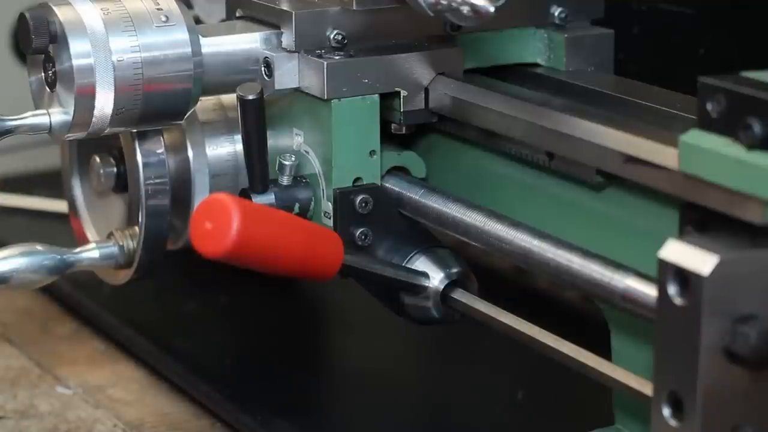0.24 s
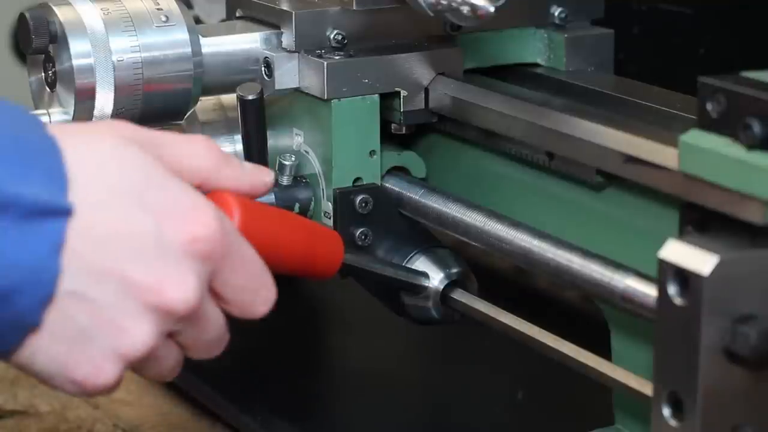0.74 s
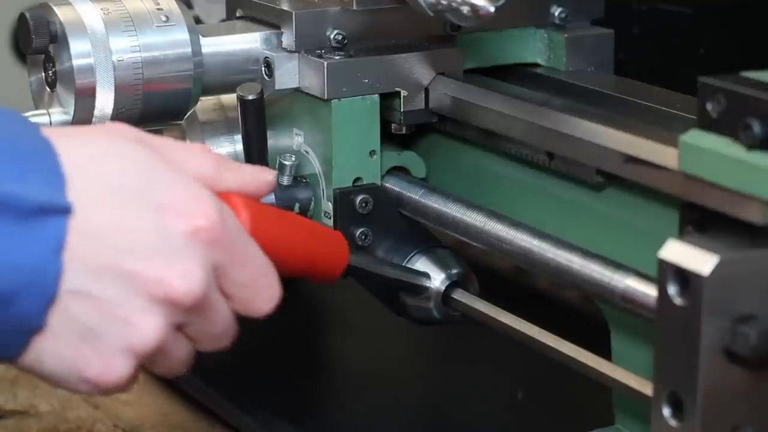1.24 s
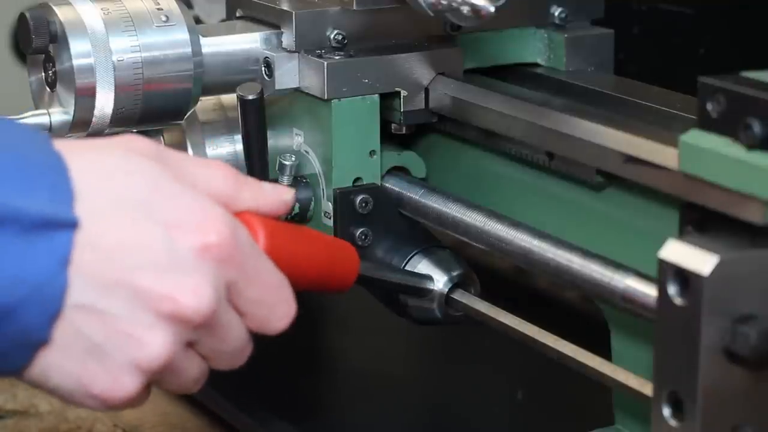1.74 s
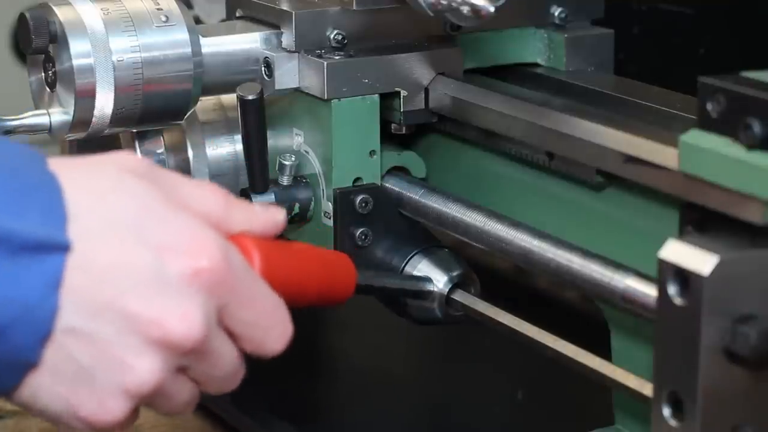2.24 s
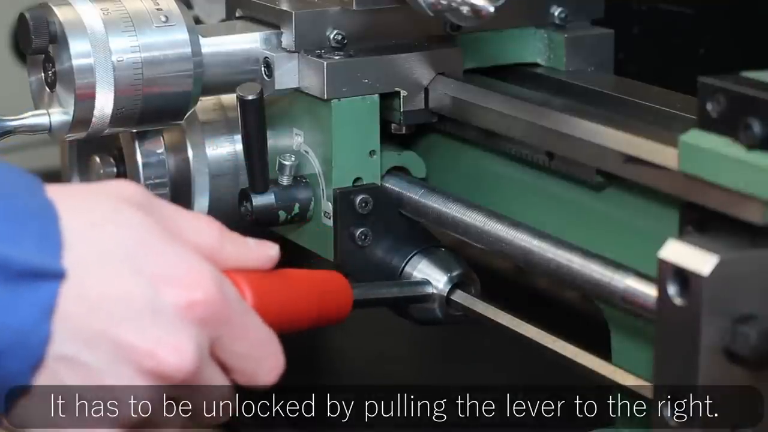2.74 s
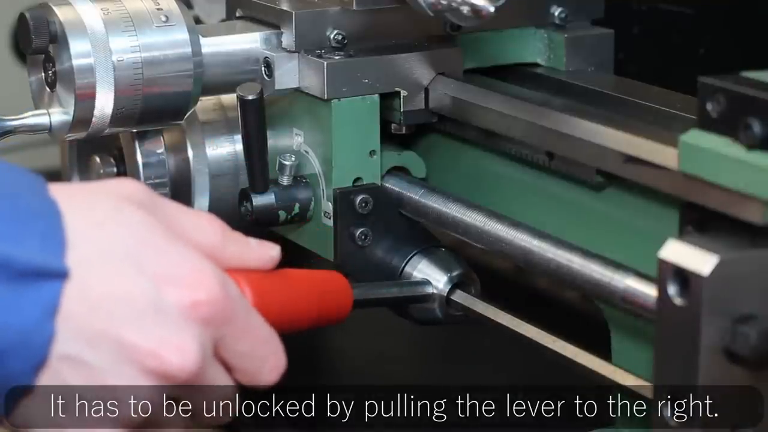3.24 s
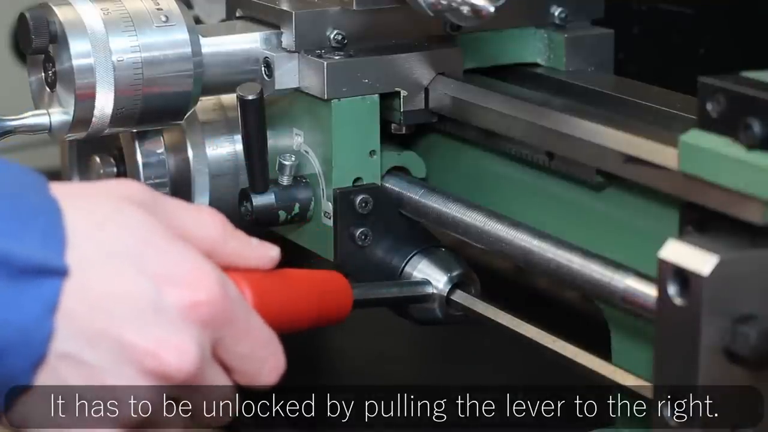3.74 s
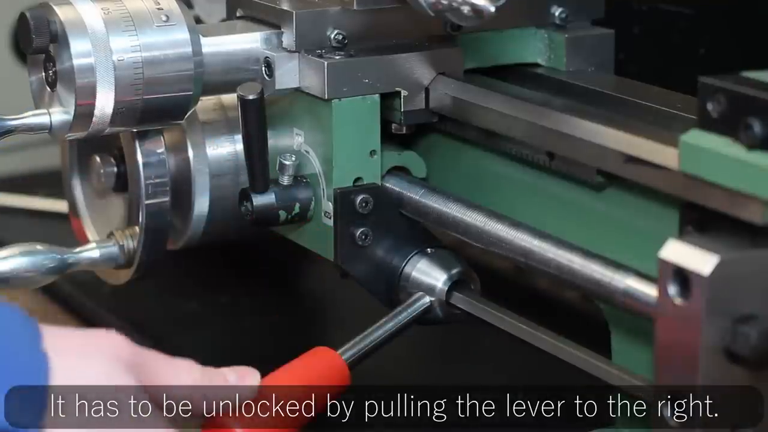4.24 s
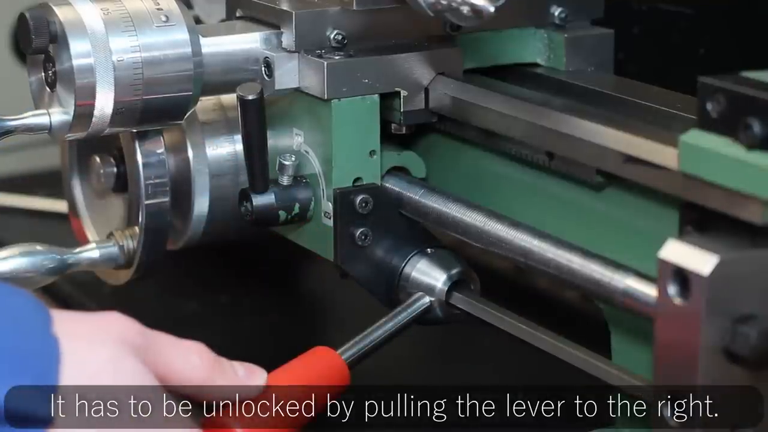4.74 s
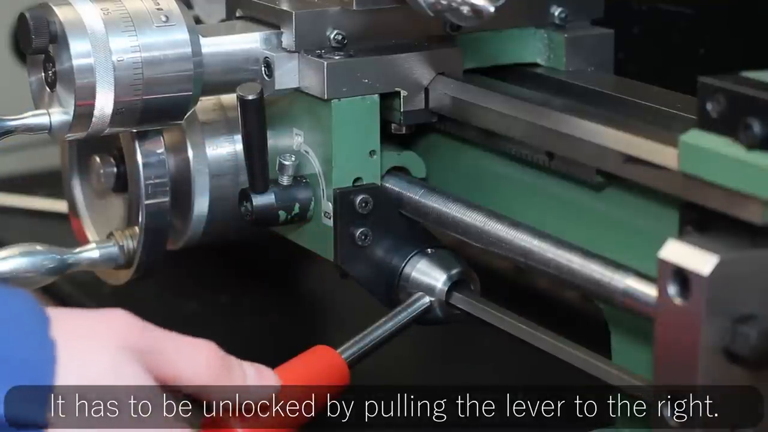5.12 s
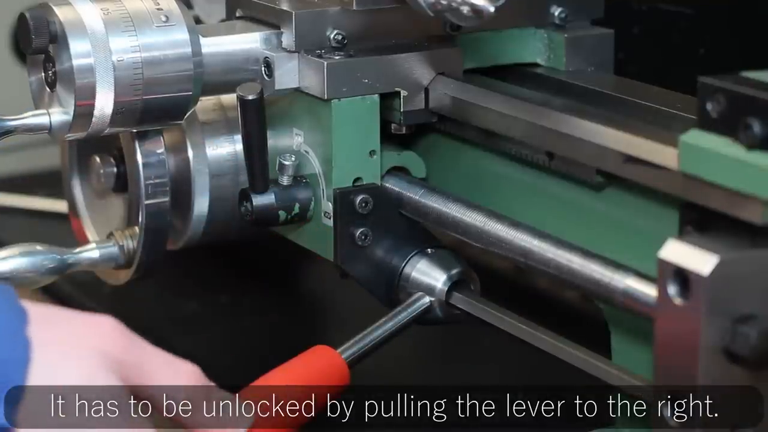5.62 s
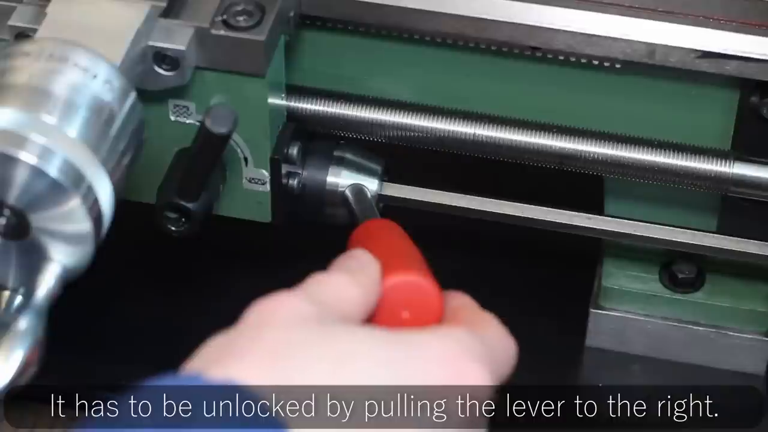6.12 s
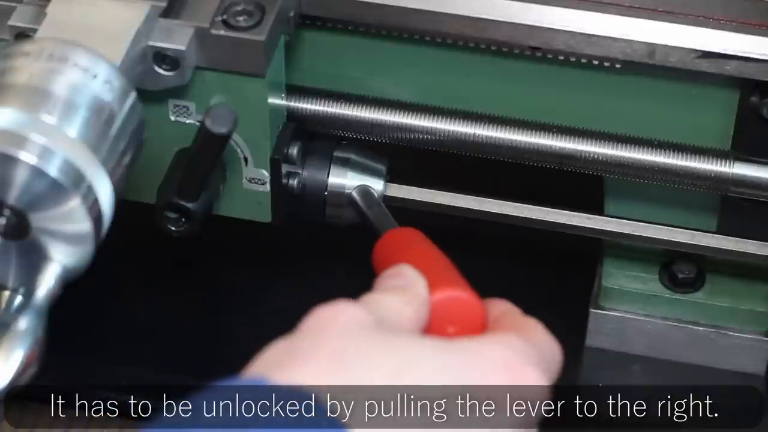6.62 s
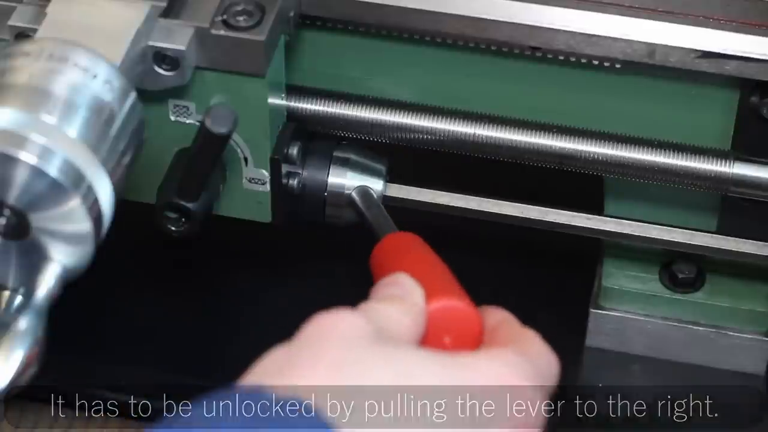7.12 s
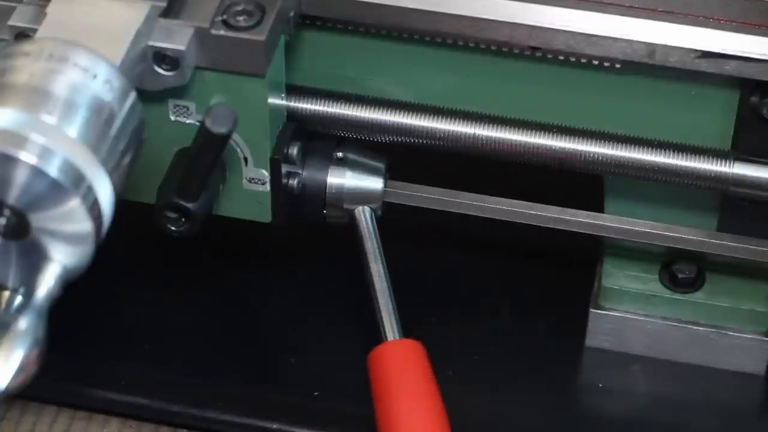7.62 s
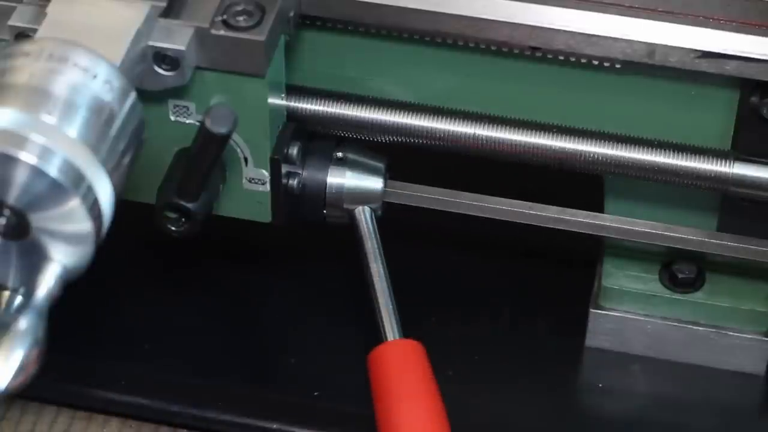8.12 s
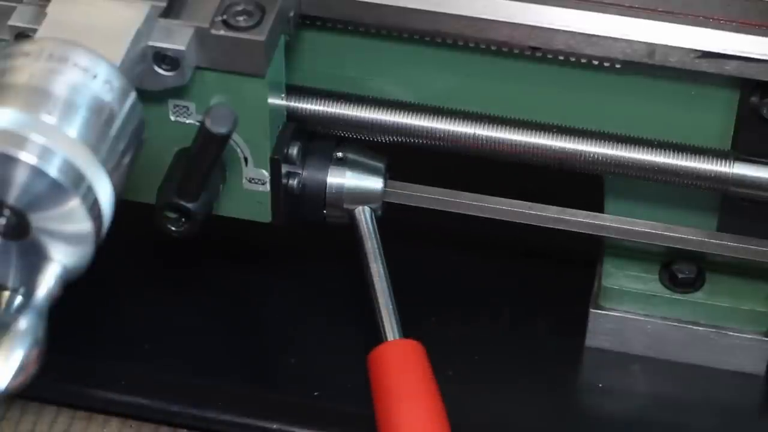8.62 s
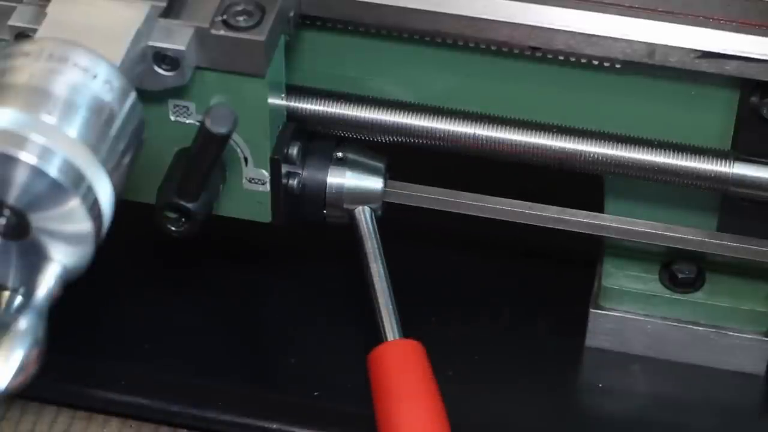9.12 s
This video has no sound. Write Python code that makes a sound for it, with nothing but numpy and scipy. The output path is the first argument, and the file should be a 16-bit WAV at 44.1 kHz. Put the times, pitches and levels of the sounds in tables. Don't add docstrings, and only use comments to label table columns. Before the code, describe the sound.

Close mono pickup of a small metal lathe. Soft air and hiss come first, then a light touch, a loud unlocking clack and dry metallic scraping with bright clicks. A switch snaps, and the geared motor surges upward in pitch, chattering and singing before steadying. The run ends suddenly with the change of viewpoint. After a quieter pause with small handling sounds, a heavier double clack launches another, brighter run with deeper throbbing.

```python
import sys
import numpy as np
from scipy import signal
from scipy.fft import rfft, irfft, next_fast_len
from scipy.io import wavfile
from scipy.ndimage import uniform_filter1d, map_coordinates

SR = 44100
rng = np.random.default_rng(int(sys.argv[2]) if len(sys.argv) > 2 else 0)


def invert_db(level):
    return 10 ** (np.asarray(level, dtype=float) / 20)


def master(y):
    cut = np.clip(np.atleast_2d(y).T, -1, 1)
    pcm = np.round(cut * 32767)
    wavfile.write(sys.argv[1], SR, pcm.astype(np.int16))


N = 413216
TIME = np.arange(N) / SR


def unit(x):
    return x / np.sqrt(np.mean(x ** 2) + 1e-20)


def noise():
    return rng.standard_normal(N)


def wobble(rate):
    knots = rng.standard_normal(int(N * rate / SR) + 4)
    return map_coordinates(knots, [TIME * rate])


def sine(hz, phase=0):
    return np.sin(2 * np.pi * hz * TIME + phase)


def filtered(x, response):
    m = next_fast_len(N + SR // 2)
    hz = np.fft.rfftfreq(m, 1 / SR) + 1e-3
    return irfft(rfft(x, m) * response(hz), m)[..., :N]


def colour(points):
    hz, db = np.transpose(points)
    return lambda f: invert_db(np.interp(np.log(f), np.log(hz), db))


def modes(peaks):
    def response(f):
        total = 0
        for k, (hz, width, db) in enumerate(peaks):
            damping = 1j * f * width
            total = total + (-1) ** k * invert_db(db) * damping / (hz * hz - f * f + damping)
        return total
    return response


def band(x, lo_hz, hi_hz):
    return unit(filtered(x, lambda f: 1 / np.sqrt((1 + (lo_hz / f) ** 16) * (1 + (f / hi_hz) ** 16))))


def bursts(times, levels_db, t60s, rise):
    env, t = np.zeros(N + SR), np.arange(SR // 2) / SR
    for s, db, t60 in zip(times, levels_db, t60s):
        env[round(s * SR):][:len(t)] += invert_db(db - 60 * t / t60) * (1 - np.exp(-t / rise))
    return env[:N]


def impacts(spiky_db, rate):
    return noise() * invert_db(spiky_db * wobble(rate))


def speed(start_s, full_hz):
    ramp_s, overshoot_hz, hunt_s, hunt_fade_s = .225, 12, .4, .25
    since = np.maximum(TIME - start_s - ramp_s, 0)
    swing = overshoot_hz * np.exp(-since / hunt_fade_s) * np.sin(2 * np.pi * since / hunt_s)
    return full_hz * np.clip((TIME - start_s) / ramp_s, 0, 1) + swing


# drive_multiple, first_run_db, second_run_db, added_pulling_db, added_braking_db
ORDERS = [(4, -45, -46, 9, 15), (6, -47, -49, 18, -6), (8, -48, -50, 8, 22), (12, -47, -48, 6, 11),
          (16, -52, -54, 4, 25)]
# pitch_hz, first_run_db, second_run_db
SINGING = [(414, -44.5, -41.5), (699, -56, -49)]
# drive_multiple, first_run_db, second_run_db
SIDE_TONES = [(2, -67.5, -72), (3, -80, -75), (4, -76, -76), (6, -78, -73)]


def motor(drive_hz, bed, run):
    angle = 2 * np.pi * np.cumsum(drive_hz) / SR
    slope = np.gradient(drive_hz) * SR
    unrest = 1 + np.minimum(np.abs(slope) / 150, 2.5)
    change = uniform_filter1d(slope, size=900)
    pull = np.clip(change / 150, 0, 1) * (drive_hz / drive_hz.max()) ** 2
    brake = np.clip(-change / 62, 0, 1)
    grid_hz = np.arange(1, 3000, 2.)
    bed_gain = np.abs(modes(bed)(grid_hz)) ** .5

    tones = np.zeros(N)
    for multiple, *run_db, pull_db, brake_db in ORDERS:
        level_db = run_db[run] + pull_db * pull + brake_db * brake
        level_db += 2.3 * (pull + brake) * (wobble(45) - 2.05)
        level_db += 1.6 * wobble(7) + 1.5 * unrest * wobble(60)
        tone = np.sin(multiple * angle + 0.41 * unrest * wobble(50))
        tones += np.interp(multiple * drive_hz, grid_hz, bed_gain) * invert_db(level_db) * tone

    turning = np.clip(3 * drive_hz / drive_hz[-1] - .4, 0, 1)
    for hz, *run_db in SINGING:
        level_db = run_db[run] + 1.6 * wobble(9) + 1.3 * wobble(40)
        tones += turning * invert_db(level_db) * sine(hz, .6 * wobble(25))

    carrier_hz = 15961
    for multiple, *run_db in SIDE_TONES:
        tones += invert_db(run_db[run] + 2.8 * wobble(25)) * sine(carrier_hz, -multiple * angle)
    shaft_angle = 27.2 / 148 * angle
    return np.sqrt(2) * tones, shaft_angle


SPLITS_HZ = [120, 480, 1380, 4000, 19000]


def gears(effort_db, slow_db, inrush, bed, wash, knocks, shaft, wash_db, throb_db, knock_hz, hum_db,
          growl_db, hiss_db, cap_db):
    growl_db = growl_db + effort_db - 0.054 * slow_db
    rattle_db = effort_db + 0.78 * slow_db
    hiss_db = hiss_db + 0.86 * (effort_db + 28.5) + 0.89 * slow_db
    running_db = np.minimum(growl_db, cap_db)
    turn = (1 + 0.13 * wobble(6)) * np.cos(shaft + 0.55 * wobble(3.2))

    s, peak_db = np.transpose(knocks)
    blows = bursts(s - .003, peak_db, 0 * s + 0.03, rise=0.002)
    first_contact = bursts(s - .001, peak_db + 8, 0 * s + .0006, rise=.00005)
    forces = np.array([invert_db(throb_db * turn) * impacts(2.14, 400),
                       invert_db(0.42 * throb_db * turn) * impacts(2.7, 400),
                       first_contact + invert_db(-9) * blows * noise()])
    rattled_bed = [(hz, w, db - 6 * (hz < 800 and w < 20)) for hz, w, db in bed]
    main, fine, struck = filtered(forces, modes(rattled_bed))

    def body(ringing, depth_db):
        broad = filtered(invert_db(depth_db * turn) * impacts(0.87, 600), colour(wash))
        return unit(ringing) + invert_db(wash_db) * unit(broad)

    steady = body(main, throb_db)
    sound = invert_db(running_db - 9.5) * band(steady, *SPLITS_HZ[:2])
    sound += invert_db((growl_db + running_db) / 2 - 2) * band(steady, *SPLITS_HZ[1:3])
    sound += invert_db(rattle_db - 3) * band(steady, *SPLITS_HZ[2:4])
    sound += invert_db(hiss_db) * band(body(fine, 0.41 * throb_db), *SPLITS_HZ[3:])
    sound += invert_db(running_db - 34) * band(steady, 25, 97)

    sound += invert_db(0.5) * np.sqrt(np.mean(blows ** 2)) * band(struck, knock_hz, 3400)
    hum = np.sqrt(2) * sine(99, .5 * wobble(12))
    return sound + (invert_db(hum_db) + inrush) * invert_db(0.44 * slow_db + 2.7 * wobble(10)) * hum


def spindle(start_s, full_hz, effort, bed, wash, knocks, run, **mix):
    drive_hz = speed(start_s, full_hz)
    effort_s, effort_points_db = np.transpose(effort)
    effort_db = np.interp(TIME, effort_s, effort_points_db)
    gate = (TIME >= effort_s[0]) & (TIME <= effort_s[-1])
    tones, shaft = motor(drive_hz, bed, run)
    slow_db = 20 * np.log10(np.clip(drive_hz / full_hz, .15, 1))
    inrush_peak_s, inrush_width_s = start_s + 0.2, 0.23
    inrush = invert_db(-54) * np.exp(-((TIME - inrush_peak_s) / inrush_width_s) ** 2)
    return gate * (tones + gears(effort_db, slow_db, inrush, bed, wash, knocks, shaft, **mix))


# pitch_hz, width_hz, level_db
BED_SIDE = [(408, 10, -0.5), (499, 69, -12.0), (592, 11, 1.5), (700, 13, -10.0), (770, 8, -19.5),
            (876, 16, 0.0), (1119, 19, -3.5), (1186, 8, -8.5), (1261, 150, -18.0), (1331, 8, -9.5),
            (1501, 78, -12.5), (1601, 95, -7.5), (1746, 35, -1.0), (1862, 33, -10.5), (1942, 29, -6.5),
            (2042, 18, -5.5), (2096, 50, -8.5), (2187, 51, -7.0), (2299, 53, -8.5), (2413, 36, -13.5),
            (2463, 16, -11.5), (2558, 30, -11.5), (2685, 31, -10.0), (2778, 19, -3.0), (2886, 86, -9.0),
            (3050, 93, -11.5), (3167, 44, -12.0), (3431, 85, -17.0), (3574, 11, -14.5), (3649, 16, -20.5),
            (3841, 46, -18.5), (4075, 23, -20.0), (4189, 8, -25.5), (4326, 16, -23.5), (4475, 47, -22.5),
            (4943, 150, -24.5), (5160, 40, -21.0), (5361, 150, -32.5), (5712, 37, -22.5), (5982, 8, -21.5),
            (6139, 8, -30.0), (6231, 8, -22.0), (6353, 49, -26.5), (6526, 126, -29.0), (6888, 150, -30.5),
            (7428, 8, -29.0)]
# pitch_hz, level_db (per Hz)
WASH_SIDE = [(18, -45.0), (60, -28.0), (140, -25.0), (250, -20.5), (780, -22.5), (1400, -19.0),
             (2200, -26.5), (3300, -26.5), (5500, -31.0), (8000, -36.5), (11000, -44.0), (11700, -41.5),
             (15800, -44.0)]
# start_s, peak_db
KNOCKS_FIRST = [(4.3093, -26), (4.3772, -20.5), (4.4226, -17), (4.4689, -18), (4.5268, -20), (4.5617, -19),
                (4.7304, -23), (4.7543, -19), (4.7912, -18.5), (4.8326, -18.5), (4.9174, -18.5),
                (4.9903, -28), (5.0671, -23), (5.096, -20.5), (5.1404, -25), (5.1679, -18), (5.2237, -23),
                (5.3519, -21.5), (5.3968, -22.5), (5.4682, -22), (5.5849, -23), (5.6203, -25),
                (5.6567, -22.5), (5.7246, -20.5), (5.759, -19), (5.8822, -23.5), (5.9072, -15.5)]
# time_s, level_db
EFFORT_FIRST = [(4.212, -62), (4.261, -28), (4.285, -29.5), (4.32, -29.5), (4.44, -24.5), (4.5, -26.5),
                (4.64, -25), (4.685, -26.5), (4.715, -31.5), (4.77, -26), (4.855, -27.5), (4.9, -30.5),
                (4.96, -31.5), (5.09, -30), (5.5, -30), (6.028, -30)]


def first_run():
    return spindle(4.212, 148.1, EFFORT_FIRST, BED_SIDE, WASH_SIDE, KNOCKS_FIRST, run=0,
                   wash_db=-10.5, throb_db=1.8, knock_hz=1520, hum_db=-63.5,
                   growl_db=-4, hiss_db=-44.5, cap_db=-33)


# pitch_hz, width_hz, level_db
BED_ABOVE = [(409, 8, 1.5), (588, 18, -2.0), (702, 8, -2.5), (811, 8, -11.0), (877, 38, -5.5),
             (1202, 150, -11.0), (1328, 17, -10.5), (1493, 68, -9.0), (1660, 57, -4.5), (1766, 38, -3.0),
             (1850, 43, -3.0), (1947, 150, -11.5), (2051, 30, -6.5), (2126, 14, -10.0), (2205, 44, -9.5),
             (2418, 85, -10.0), (2549, 19, -8.0), (2682, 51, -5.0), (2782, 20, 3.0), (2850, 31, 2.5),
             (2943, 54, -4.0), (3088, 64, -8.0), (3342, 41, -12.0), (3432, 25, -10.0), (3605, 66, -17.0),
             (3662, 35, -14.0), (3831, 115, -16.5), (3945, 41, -12.5), (4090, 101, -23.0),
             (4204, 30, -18.0), (4351, 24, -15.5), (4459, 55, -15.5), (4682, 136, -17.0),
             (5002, 150, -19.0), (5226, 42, -18.0), (5331, 29, -22.0), (5425, 8, -40.5), (5606, 150, -30.0),
             (5874, 16, -17.5), (5996, 27, -30.0), (6132, 8, -22.0), (6238, 31, -23.5), (6498, 21, -24.0),
             (6619, 83, -29.0), (6874, 44, -25.0), (7132, 89, -28.5)]
# pitch_hz, level_db (per Hz)
WASH_ABOVE = [(18, -37.5), (60, -39.5), (140, -27.5), (250, -15.0), (780, -17.5), (1400, -23.0),
              (2200, -13.0), (3300, -32.5), (5500, -28.0), (8000, -36.0), (11000, -45.5), (11700, -40.5),
              (15800, -43.0)]
# start_s, peak_db
KNOCKS_SECOND = [(7.634, -17), (7.671, -14), (7.6982, -19), (7.799, -26), (7.8244, -22), (7.8673, -22),
                 (7.9003, -23), (7.9406, -24), (7.985, -22), (8.0225, -19), (8.0552, -21), (8.1327, -25),
                 (8.1816, -32), (8.224, -16.5), (8.2647, -24), (8.288, -18), (8.3631, -15.5),
                 (8.4038, -18.5), (8.4965, -20), (8.5522, -20), (8.6031, -27), (8.6275, -22), (8.6682, -28),
                 (8.7032, -21), (8.76, -22), (8.8166, -25), (8.849, -18.5), (8.9216, -17.5), (8.9613, -18),
                 (8.9967, -23), (9.0294, -15.5), (9.071, -21.5), (9.102, -18), (9.1339, -19.5),
                 (9.1818, -26), (9.2084, -24), (9.2624, -25), (9.2835, -20), (9.3289, -24), (9.3554, -22)]
# time_s, level_db
EFFORT_SECOND = [(7.44, -49), (7.48, -33.5), (7.52, -26), (7.66, -22), (7.72, -23.5), (7.86, -22.5),
                 (7.95, -24.5), (8.25, -27), (9.37, -26.5)]


def second_run():
    return spindle(7.432, 148.7, EFFORT_SECOND, BED_ABOVE, WASH_ABOVE, KNOCKS_SECOND, run=1,
                   wash_db=-8.5, throb_db=2.4, knock_hz=2000, hum_db=-71,
                   growl_db=-6, hiss_db=-42.5, cap_db=-32)


# time_s, half_length_s, pitch_hz, width_hz,
# level_db
FLARES = [(4.284, 0.026, 612, 30, -36.5), (4.314, 0.051, 890, 48, -34), (7.566, .07, 415.7, 13, -33.5),
          (7.674, 0.034, 595, 33, -28), (4.282, 0.016, 144, 32, -45), (4.346, 0.071, 552, 27, -31.5),
          (4.427, 0.062, 3220, 410, -37), (7.53, 0.052, 914, 56, -36), (7.67, 0.027, 900, 40, -30),
          (7.63, .025, 1950, 70, -33.5), (7.77, 0.017, 1200, 150, -31), (4.45, .025, 880, 47, -27.5),
          (4.6, .05, 2200, 79, -32), (4.65, 0.042, 2200, 120, -33), (4.66, 0.055, 1150, 50, -33),
          (4.58, .06, 1780, 60, -31.5), (4.82, 0.042, 1720, 92, -32.5), (4.8, .05, 590, 30, -34),
          (7.82, .1, 585, 25, -31), (4.5, .06, 605, 35, -33), (4.69, .04, 560, 30, -35),
          (4.29, .05, 700, 40, -40), (8.05, .12, 590, 40, -38), (7.568, 0.066, 570, 37, -31),
          (7.633, 0.061, 3080, 320, -31)]


def flares():
    sound = np.zeros(N)
    for s, half_s, hz, width, db in FLARES:
        mode = modes([(hz, width, 0)])
        ringing = unit(filtered(noise(), lambda f: mode(f) ** 2))
        sound += invert_db(db) * np.exp(-((TIME - s) / half_s) ** 2) * ringing
    return sound


# pitch_hz, width_hz, level_db
ROD = [(402, 4.9, 2), (468, 10.2, 7.5), (568, 39, -0.5), (673, 18, 0.5), (880, 41, -2.5), (1007, 12, -4),
       (1129, 35, -4), (1570, 150, -16.5), (1714, 29, -9.5), (1980, 160, -18.5), (2420, 20, -20),
       (2744, 27, -13), (3080, 160, -20), (5130, 40, 1.5), (6400, 1400, -8)]
# pitch_hz, width_hz, level_db
BENCH = [(90, 21, -6.5), (128.7, 12.4, 4.5), (219, 13.6, -0.5), (275, 6.5, -2)]
# start_s, length_s, scrape_db, rumble_db
HOLDS = [
    (1.363, 0.091, -61, -70),
    (1.998, 0.39, -78, -63.5),
    (2.452, 1.01, -55, -64.5),
    (3.452, 0.74, -53, -67.5),
    (4.12, 0.16, -58.5, -70),
    (6.026, 0.044, -60, -63),
    (6.09, 0.4, -80, -71.5),
    (6.75, .42, -87, -76),
    (6.353, 1.5, -73.5, -73),
]
# start_s, scrape_db, rumble_db, t60_s
JOLTS = [(1.375, -55, -64, 0.47), (2.24, -64, -68, 0.23), (2.42, -58, -56, 0.22), (2.451, -41.5, -59, 0.56),
         (2.525, -47, -70, 0.15), (2.74, -53, -77, 0.24), (2.822, -64, -83, 0.88), (3.17, -58, -75, .3),
         (3.224, -55, -75, .2), (3.287, -49.5, -66, 0.5), (3.42, -60, -79, .3), (3.53, -54, -79, .3),
         (3.56, -54, -79, 0.3), (3.625, -54, -79, .3), (3.665, -56, -79, .3), (4.225, -46, -70, 0.59),
         (6.075, -50, -63, 0.18), (6.48, -58, -63, 0.29), (7.165, -72, -75, 0.2), (7.29, -74, -77, .2),
         (7.35, -57, -78, .3), (7.385, -42, -58, 1), (7.452, -60, -62, 0.26)]


def lever_drag():
    scrape = band(filtered(impacts(3.2, 50), modes(ROD)), 380, 2500)
    pin = modes([(5170, 170, 0)])
    scrape += invert_db(-29) * unit(filtered(impacts(6, 60), lambda f: pin(f) ** 2))
    rumble = unit(filtered(impacts(1.5, 20), modes(BENCH)))
    s, scrape_db, rumble_db, t60 = np.transpose(JOLTS)
    drag = bursts(s, scrape_db, t60, rise=0.012)
    lean = bursts(s, rumble_db, t60, rise=0.012)
    for s, length, scrape_db, rumble_db in HOLDS:
        fade_s = min(0.07, length / 4)
        grip = np.clip(np.minimum(TIME - s, s + length - TIME) / fade_s, 0, 1)
        drag += invert_db(scrape_db) * grip
        lean += invert_db(rumble_db) * grip
    return drag * scrape + lean * rumble * invert_db(1.8 * wobble(6))


# start_s, tick_db (above 3.5 kHz), clack_db (1.3-3.5 kHz)
CLICKS = [(1.3834, -59, -65), (2.4525, -43, -32.5), (2.4714, -43, -62), (2.5247, -38, -42.5),
          (2.6184, -47, -59), (2.7651, -48, -57), (2.8224, -57, -46), (3.0096, -43.5, -56),
          (3.1053, -46, -64), (3.162, -43.5, -59), (3.2246, -50, -53.5), (3.285, -64, -46),
          (3.3234, -49, -57), (3.4815, -49, -60), (3.5613, -42.5, -54.5), (3.623, -48, -56),
          (3.6671, -45, -64), (3.7349, -42.5, -60), (3.816, -46, -54), (3.8771, -47.5, -59),
          (4.0148, -46, -53), (4.0715, -42, -58), (4.128, -44.5, -58), (6.073, -40, -55.5),
          (6.4824, -56, -59), (7.3847, -44, -33), (7.4014, -33, -55)]


def lever_clicks():
    s, tick_db, clack_db = np.transpose(CLICKS)
    steel = unit(filtered(noise(), modes(ROD))) + invert_db(-2) * noise()
    sound = bursts(s, tick_db - 12, 0 * s + 0.077, rise=0.00037) * band(steel, 3400, 10400)
    sound += bursts(s, clack_db + 0.5, 0 * s + 0.14, rise=.0008) * band(steel, 1410, 3350)
    return sound + bursts(s, clack_db - 9, 0 * s + 0.24, rise=0.003) * band(steel, 850, 1600)


# start_s, peak_db, t60_s
CONTACTS = [
    (4.235, -38.5, 0.21),
    (4.256, -31.5, 0.078),
    (7.456, -34.5, 0.082),
    (7.487, -41, 0.079),
]


def contacts():
    snap = unit(filtered(noise(), colour([(800, -5), (4000, 9.5), (15000, -15.5)])))
    return bursts(*np.transpose(CONTACTS), rise=0.00083) * snap


# start_s, pitch_hz, level_db, t60_s
RINGS = [(1.396, 460, -45, .1), (1.384, 1400, -55, .06), (1.397, 900, -53, .08), (1.414, 660, -47, .15),
         (1.415, 480, -47, .1), (1.428, 440, -46, .13), (1.472, 430, -58, .25), (1.472, 660, -59, .2),
         (6.078, 560, -52, .15), (6.1, 700, -53.5, .75), (6.082, 2772, -58, .15), (6.484, 2800, -55, .1),
         (6.484, 2150, -57, .08), (6.484, 3500, -59, .1), (6.484, 500, -52, .08), (6.487, 575, -47, .18),
         (7.165, 570, -60, .3)]


def rod_rings():
    sound = np.zeros(N)
    for s, hz, db, t60 in RINGS:
        tone = invert_db(1.5 * wobble(40)) * sine(hz, .5 * wobble(40))
        sound += bursts([s], [db], [t60], rise=0.001) * tone
    return sound


def collar_slip():
    slip_s, from_hz, fall_s = 4.015, 3600, .065
    fall = np.exp(-np.maximum(TIME - slip_s, 0) / fall_s)
    squeak = np.sin(2 * np.pi * from_hz * np.cumsum(fall) / SR + 2.2 * wobble(300))
    squeak *= invert_db(4 * wobble(120)) * (fall > .17)
    return bursts([slip_s], [-54], [.5], rise=.02) * squeak


# pitch_hz, level_db (per Hz)
ROOM = [(12, -40), (20, -17), (33, -17), (123, -19), (158, -13), (233, -20), (326, -13), (496, -15),
        (1080, -18), (2500, -20), (15800, -29.5)]


def room_air():
    return invert_db(-63) * unit(filtered(noise(), colour(ROOM)))


def scene():
    lathe = first_run() + second_run() + flares()
    lever = lever_drag() + lever_clicks() + contacts() + rod_rings() + collar_slip()
    return (lathe + lever + room_air())[None]


STARVED = [1.439, 2.399, 2.569, 3.125, 3.742, 3.786, 4.874, 5.109, 5.278, 5.577, 5.748, 6.046, 7.648, 8.265,
           8.33, 8.586, 8.631, 8.644, 8.692, 8.735, 8.821, 8.906]


def thin_treble(x):
    treble = filtered(x, lambda f: 1 / (1 + (7500 / f) ** 12))
    dips = sum(np.exp(-((TIME - s) / .008) ** 4) for s in STARVED)
    return x - 0.87 * dips * treble


def top_cut(x):
    return signal.sosfilt(signal.butter(12, 16460, fs=SR, output="sos"), x)


def record(dry):
    kept = filtered(dry[0], lambda f: f < 15790)
    mix = thin_treble(kept)[None] + .0007
    return top_cut(mix)


dry = scene()
out = record(dry)
master(out)
```